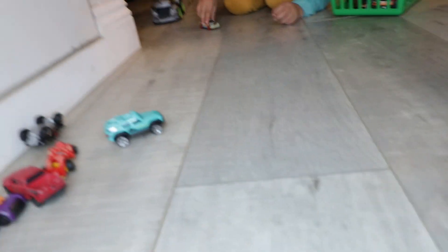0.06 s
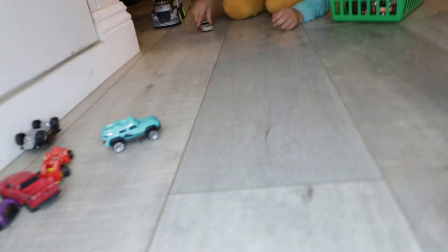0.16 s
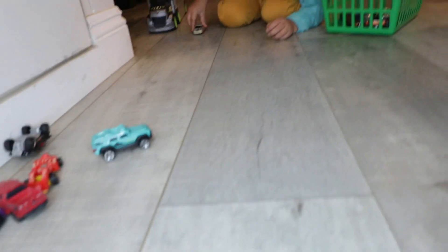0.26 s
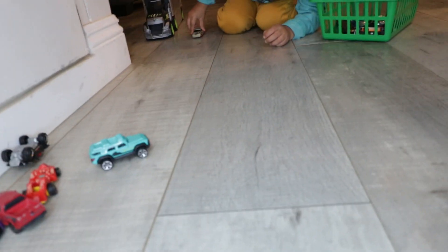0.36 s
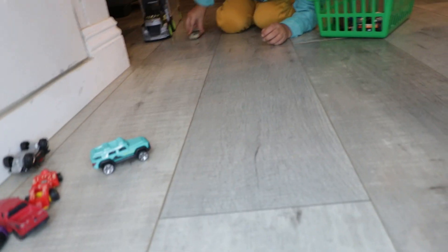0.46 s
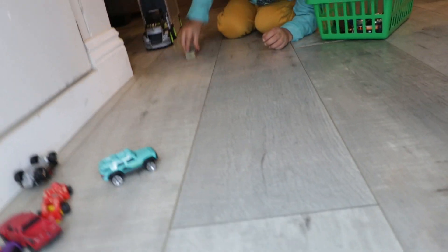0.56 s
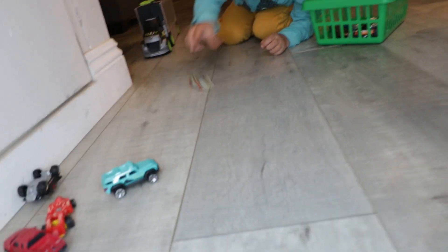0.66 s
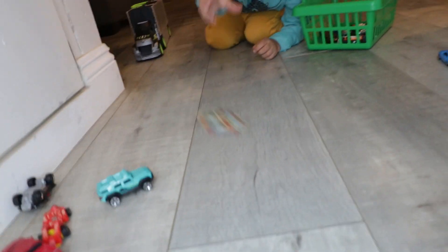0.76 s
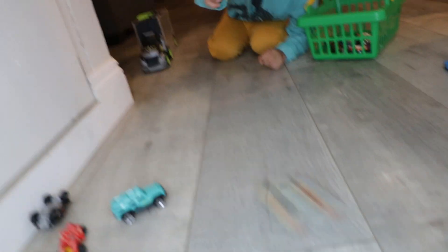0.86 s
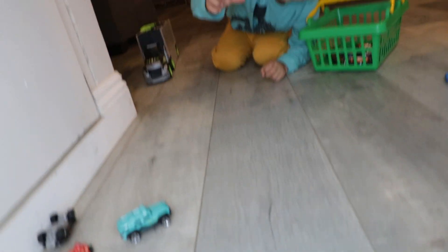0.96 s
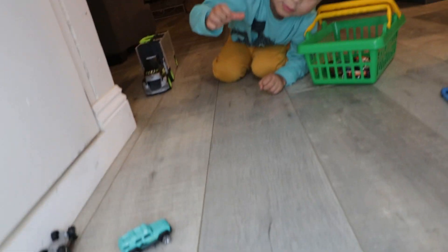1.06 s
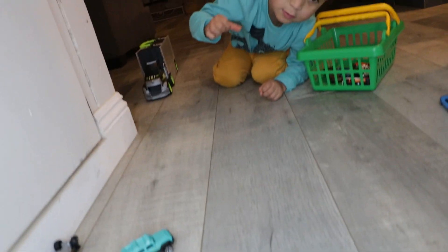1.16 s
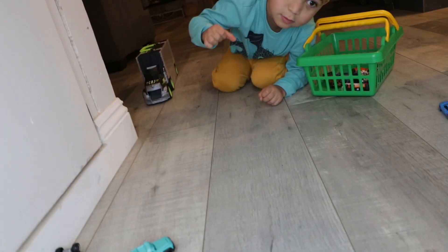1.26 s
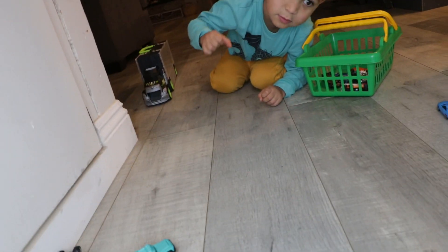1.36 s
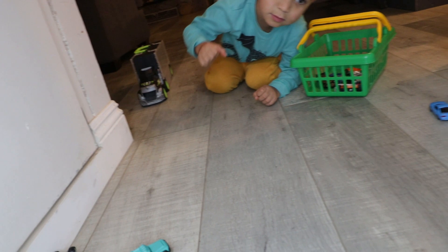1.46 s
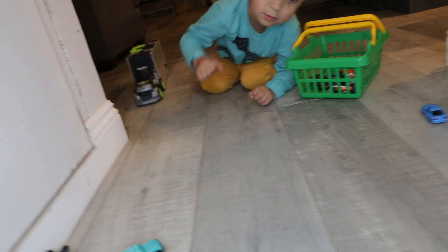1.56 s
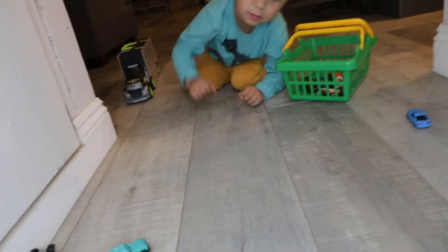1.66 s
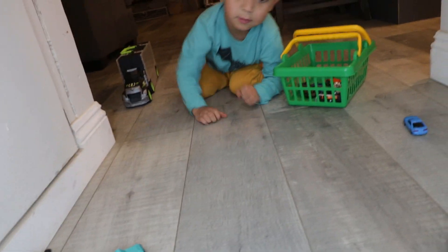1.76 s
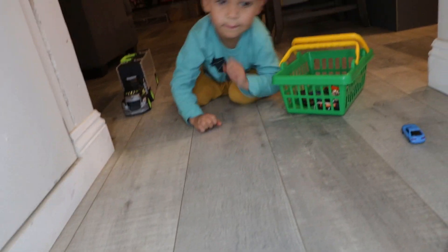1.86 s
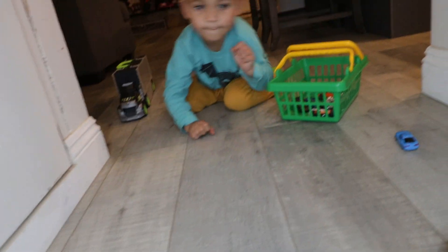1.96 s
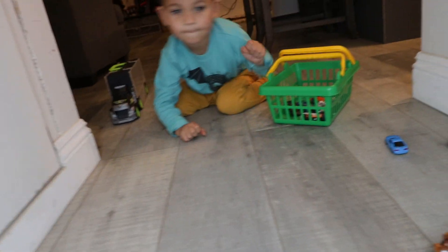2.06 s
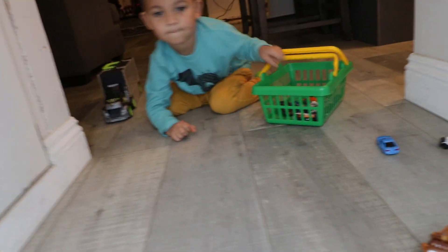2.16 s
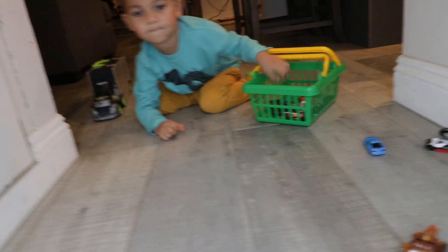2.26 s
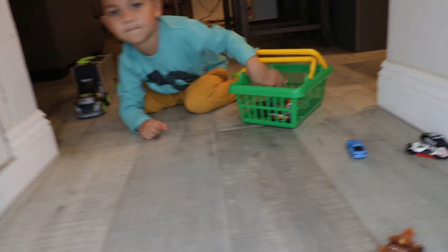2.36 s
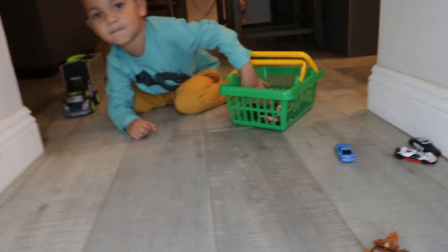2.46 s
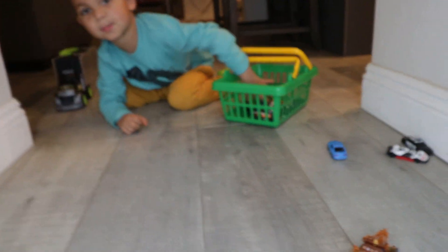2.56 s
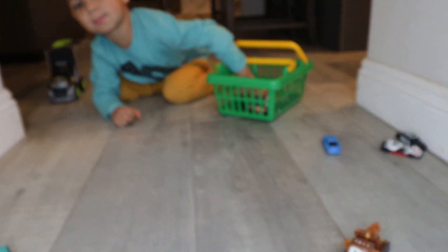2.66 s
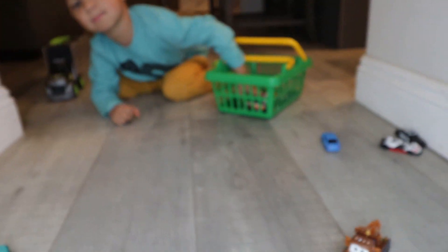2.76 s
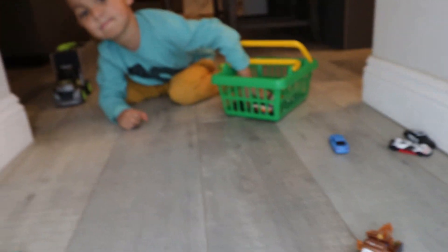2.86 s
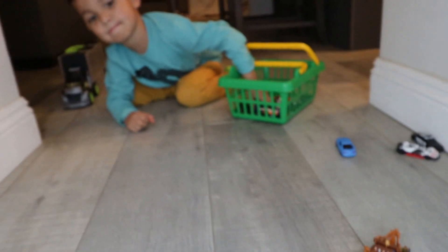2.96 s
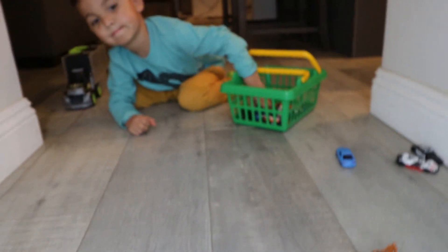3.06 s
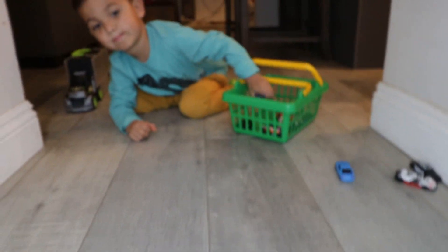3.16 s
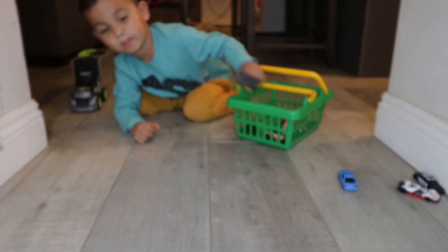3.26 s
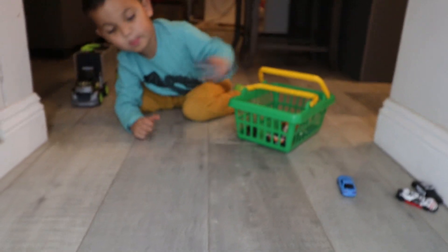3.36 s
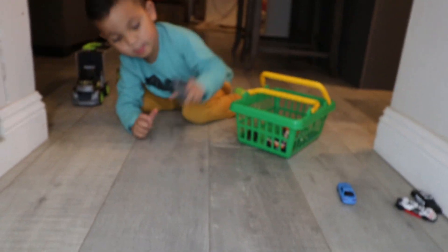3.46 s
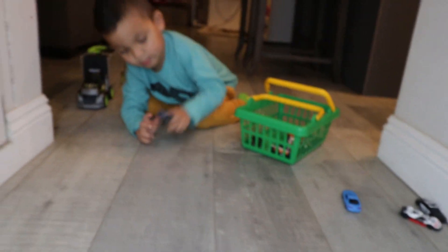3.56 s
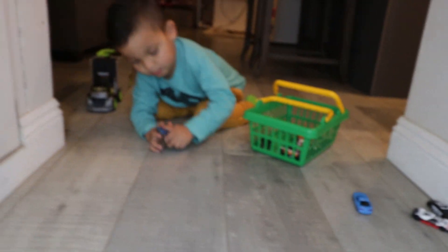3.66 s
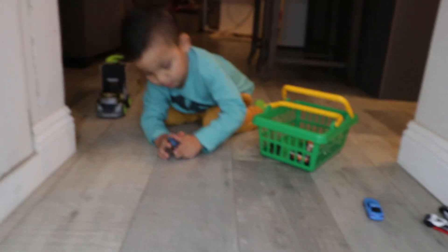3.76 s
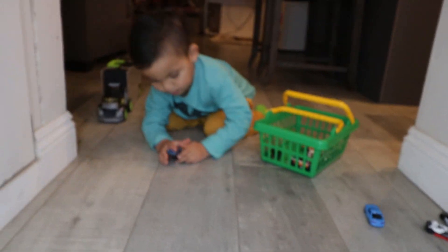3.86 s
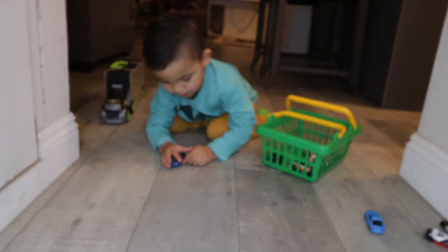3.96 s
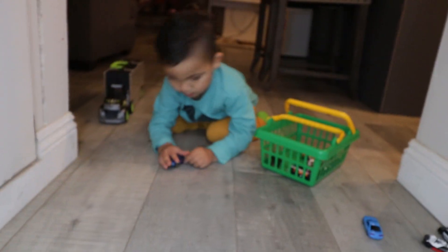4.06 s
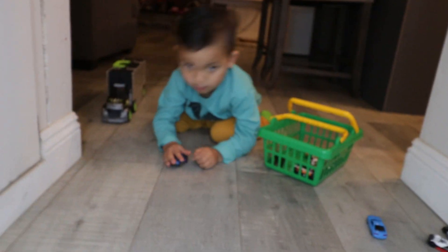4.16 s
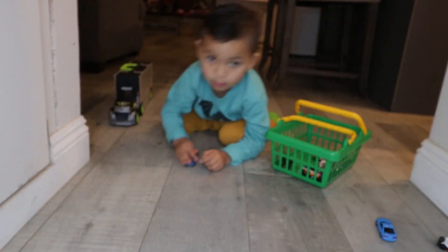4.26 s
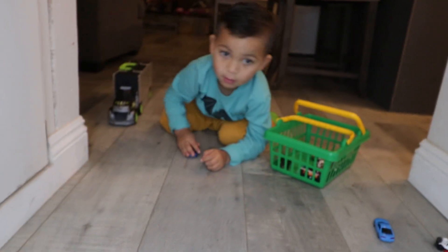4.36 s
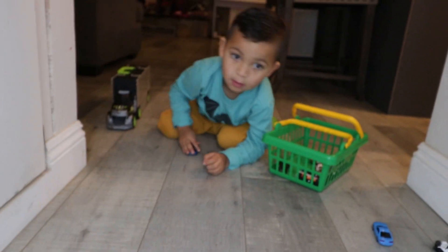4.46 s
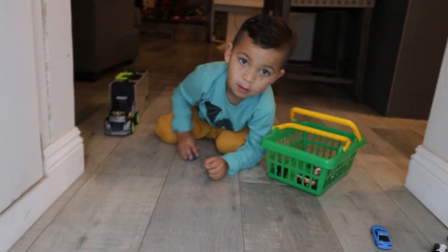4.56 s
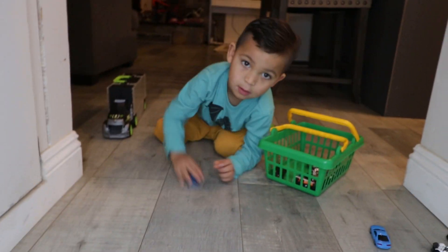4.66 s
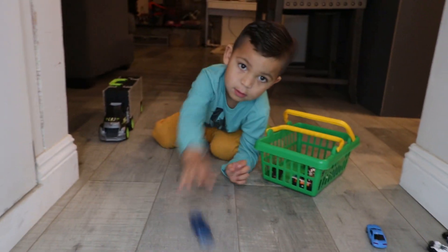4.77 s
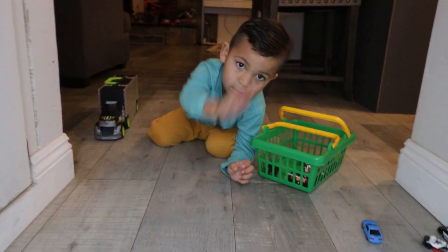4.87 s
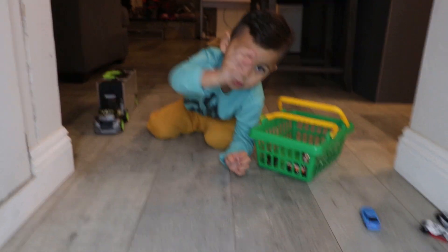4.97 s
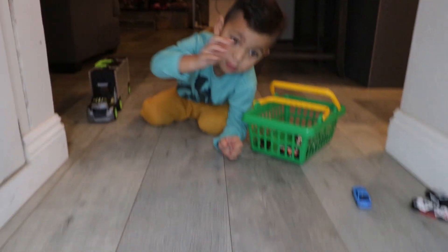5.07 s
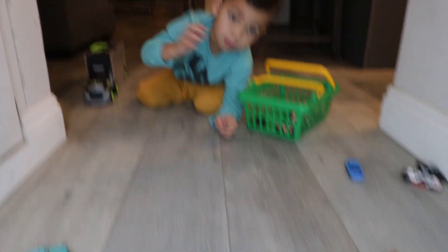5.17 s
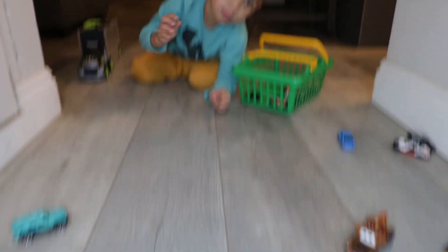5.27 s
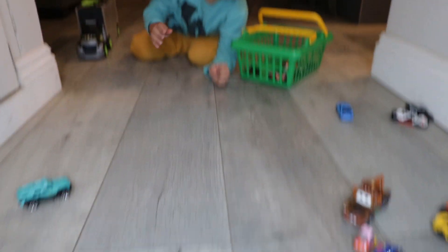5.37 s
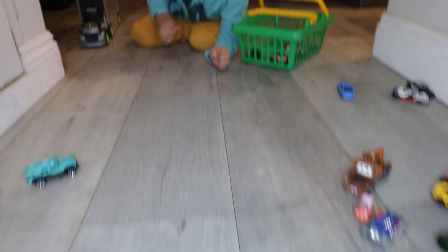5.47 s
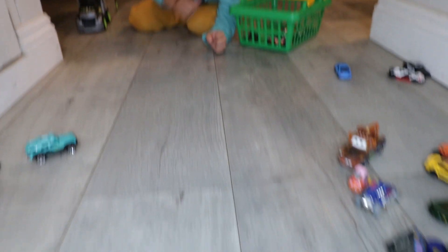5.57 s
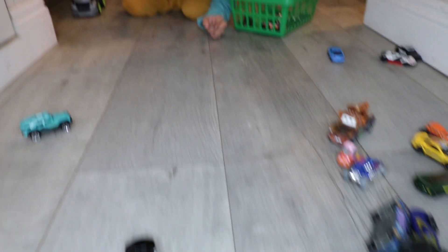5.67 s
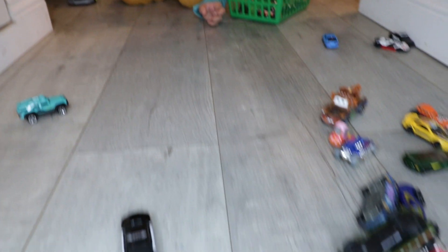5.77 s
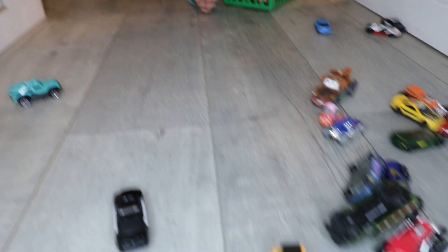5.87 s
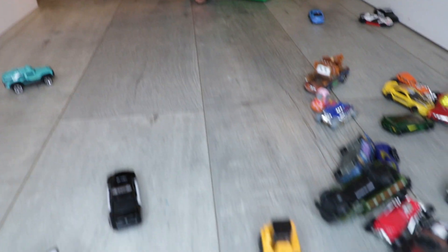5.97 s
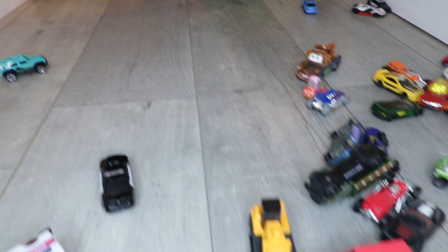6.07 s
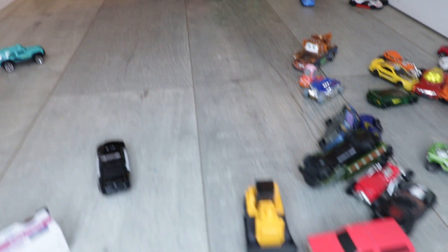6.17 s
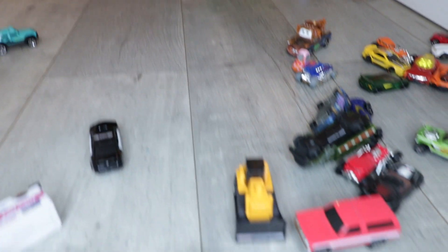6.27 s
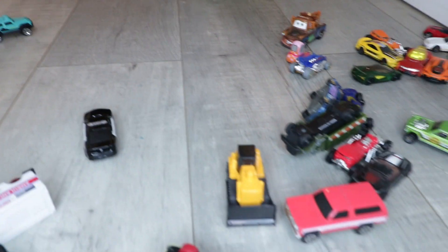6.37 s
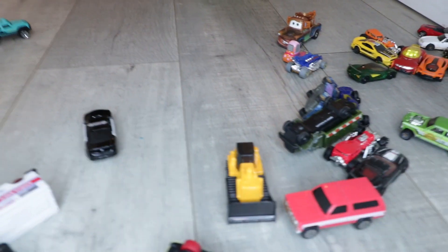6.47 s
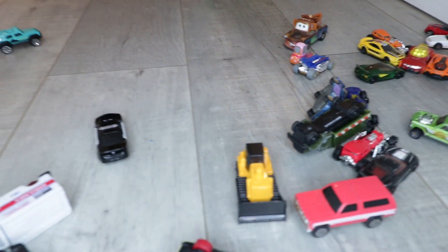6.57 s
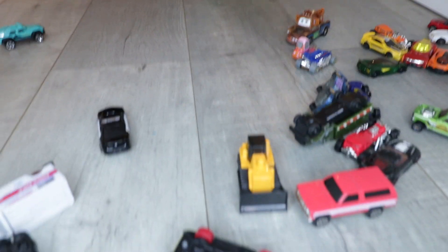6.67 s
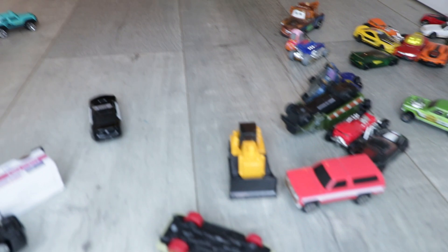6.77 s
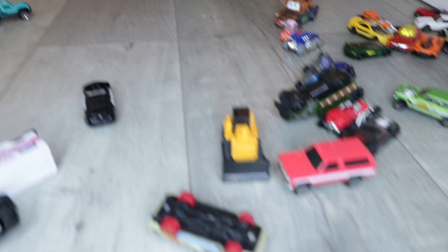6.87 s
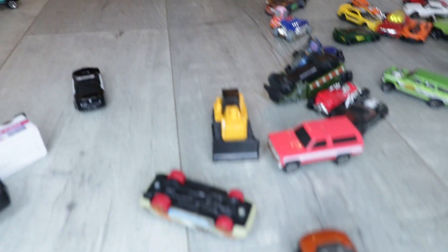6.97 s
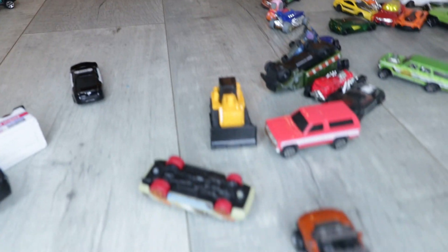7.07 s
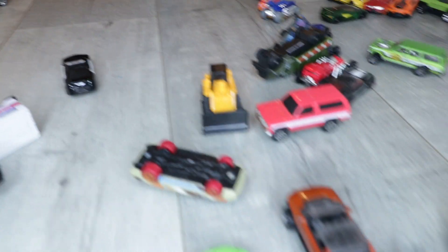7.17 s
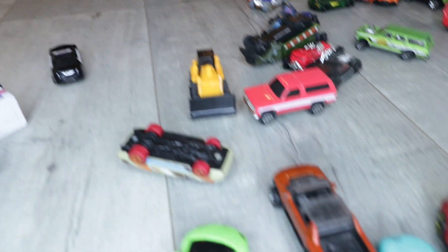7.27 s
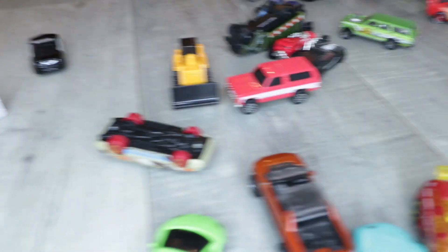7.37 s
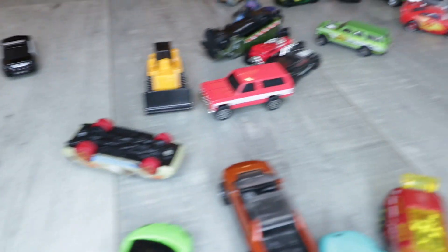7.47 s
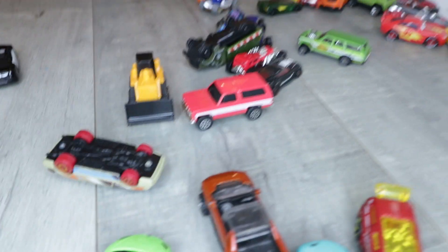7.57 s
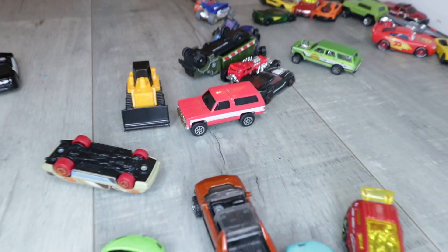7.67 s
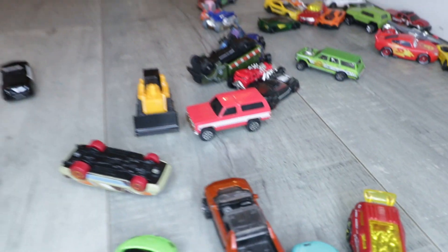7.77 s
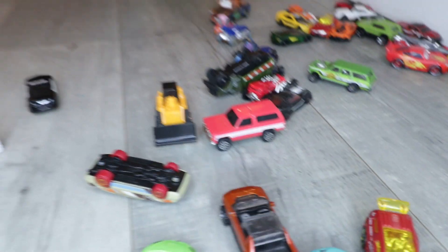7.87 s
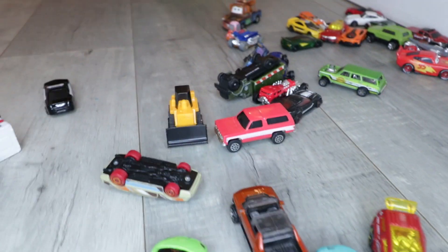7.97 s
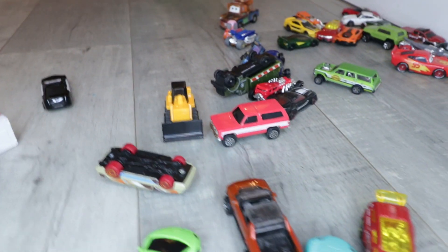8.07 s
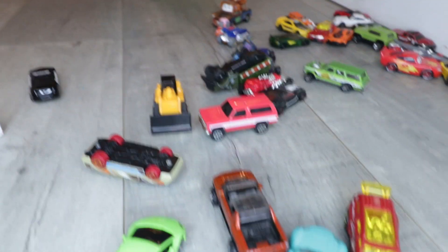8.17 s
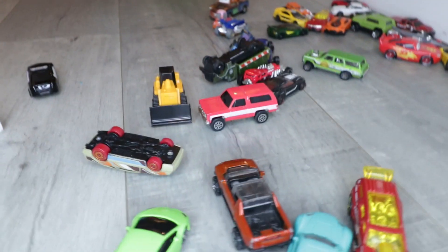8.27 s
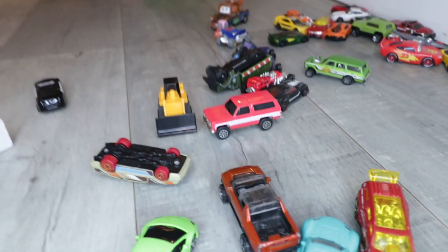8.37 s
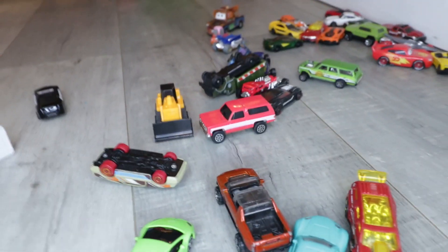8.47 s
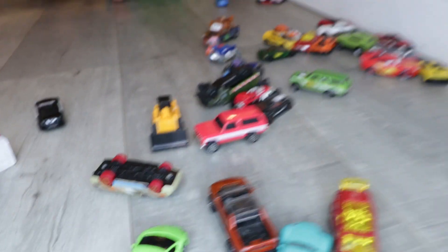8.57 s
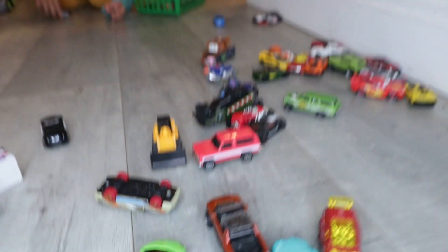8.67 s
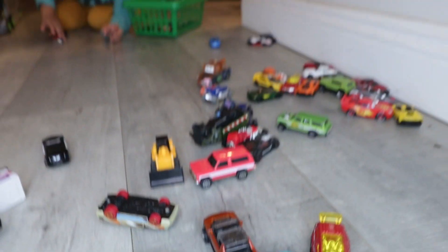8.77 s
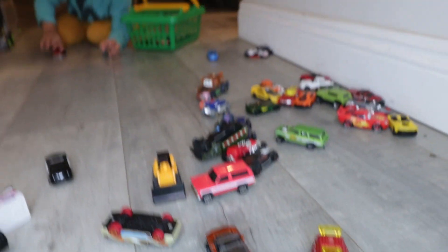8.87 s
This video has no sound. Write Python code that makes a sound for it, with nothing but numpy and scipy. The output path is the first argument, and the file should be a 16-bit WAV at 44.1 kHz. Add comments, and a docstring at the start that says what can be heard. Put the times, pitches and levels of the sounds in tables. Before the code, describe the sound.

Small metal toy cars rattle, clack and roll over a hard hallway floor, with bright dry clicks, a few wooden thuds and short pauses.

```python
"""A hallway with a hard floor: small die-cast toy cars are played with, close to a phone's microphone.
From the start a faint mains hum and room noise lie below, and wheels rattle (random bumps ring the parts).
Soon bodies clack on each other, a plastic basket and the skirting (noise bursts), and the hallway answers.
From half a second cars run free at times and whirr; heavier landings thud in the boards. Later, thin parts
ring on (dying sines) and, near 1.8 s and 8.7 s, a knee or hand lands softly (a falling sine)."""
import sys
import numpy as np
from scipy import signal
from scipy.fft import rfft, irfft, next_fast_len
from scipy.io import wavfile
from scipy.ndimage import uniform_filter1d, map_coordinates

SR = 44100
rng = np.random.default_rng(int(sys.argv[2]) if len(sys.argv) > 2 else 0)


def generate_wav(sig):
    """Save sig (samples, or channels by samples) to the path in sys.argv[1] as 16-bit PCM at SR."""
    pcm = np.round(np.clip(np.atleast_2d(sig).T, -1, 1) * 32767).astype(np.int16)
    wavfile.write(sys.argv[1], SR, pcm)


N = 393372

# the background sinks and returns: start_s, level_db
BACKGROUND_LEVEL = [(0, -42), (.55, -41.5), (.7, -75), (1.5, -55), (1.9, -47), (2.6, -47.5), (3.3, -43.5),
                    (3.8, -48.5), (3.95, -51), (4.3, -44.5), (4.7, -45), (4.9, -68), (5.6, -53.5),
                    (6.3, -45.5), (6.9, -44), (8.0, -46.5), (8.92, -46)]
# spectrum of the room noise: pitch_hz, relative level_db (per Hz)
ROOM_SPECTRUM = [(12, -41), (20, -2), (101, -17), (123, -12), (177, -7), (310, -9), (347, -8.5),
                 (472, -22.5), (660, -22), (780, -24.5), (3250, -27.5), (5850, -33.5), (16000, -44)]
# mains hum: pitch_hz, sine peak level_db (over the background level)
HUM_TONES = [(60, -7.5), (100, -10)]
# bouts of rolling and rummaging: full_from_s, hold_s, swell_db_per_s, fade_db_per_s, rattle_db,
# then rumble_db of the board, scrape_db of the hollows and grit_db (all over the rattle), hollow_pitch_hz
ROLLING_BOUTS = [(0.244, 0.044, 38, 83, -19.5, -16, -12, -17, 1440),
                 (0.555, 0.014, 250, 185, -26, -2.5, -15, -14, 1780),
                 (0.605, 0.034, 216, 240, -17.5, -36, -23, -13, 1770),
                 (0.866, 0.25, 70, 89, -30.5, -30, -18, -7.5, 1690),
                 (1.177, 0.032, 95, 120, -22, -4.5, -8, -10.5, 1930),
                 (1.357, 0.11, 120, 102, -24, -2.5, -5.5, -10.5, 1490),
                 (1.705, 0.0046, 230, 88, -33, -8.5, -5, -13, 1790),
                 (2.079, .01, 575, 100, -36.5, -9.5, -6.5, -16, 1480),
                 (2.281, 0.011, 700, 237, -16, -14, -6.5, -9, 1670),
                 (2.368, 0.084, 298, 147, -38, -9, -3, -10, 1530),
                 (2.608, 0.057, 227, 200, -29, -9, -3.5, -10, 1500),
                 (2.717, .01, 300, 47, -19.5, -16.5, -7.5, -10, 1580),
                 (2.922, 0.0088, 200, 82, -25, -13, -6, -24, 1730),
                 (3.074, .01, 107, 85, -27, -16, -8, -10, 1780),
                 (3.23, 0.039, 65, 110, -33.5, -7.5, 0.5, -19.5, 1750),
                 (3.707, .01, 294, 82, -40.5, -15, -15, -8, 1730),
                 (3.892, 0.031, 303, 96, -37.5, 0, 2, -17, 1440),
                 (4.016, 0.013, 84, 105, -33.5, -29, 1, -10, 1510),
                 (4.339, .01, 290, 49, -23.5, -27.5, -7, -11.5, 2060),
                 (4.693, 0.0091, 333, 134, -14.5, -29.5, -9.5, -7, 2160),
                 (4.86, 0.2, 87, 93.5, -22, -31, -17.5, -9.5, 1830),
                 (5.154, 0.11, 91, 80, -27, -4, -4, -15.5, 1870),
                 (5.37, 0.14, 91, 170, -30, -6, -5.5, -12, 1540),
                 (5.614, 0.011, 100, 100, -38, -5, -11.5, -7, 1250),
                 (6.004, 0.057, 1598, 55, -23.5, -18, -8.5, -8, 1750),
                 (6.395, .01, 160, 250, -38.5, -8, -3, 1, 1350),
                 (6.484, .01, 367, 70, -33, -8, -6, -11, 1650),
                 (6.627, 0.0084, 224, 210, -23.5, -21, -4, -6.5, 1770),
                 (6.746, .01, 190, 135, -23.5, -25, -14, -9, 1550),
                 (6.887, 0.012, 173, 148, -32, 4, -16, -4, 1390),
                 (6.997, 0.035, 196, 76, -22.5, -11, -7.5, -8, 1740),
                 (7.125, 0.061, 100, 104, -29.5, -19, -7.5, -7.5, 1590),
                 (7.222, .01, 120, 133, -23, -13, -11.5, -8, 1670),
                 (7.414, 0.11, 300, 63, -29, -28, -8, -4.5, 1730),
                 (7.57, .12, 80, 77, -22, -26, -11, -12, 1850),
                 (7.761, 0.096, 83, 109, -23, -8, -4, -7.5, 1670),
                 (8.352, 0.0082, 47, 100, -42, 0.5, -15, -5.5, 1400),
                 (8.442, 0.016, 215, 91, -25.5, -16.5, -11, -15, 1400),
                 (8.67, 0.024, 600, 150, -49, 12, -2, -10, 1650),
                 (8.754, 0.057, 330, 60, -37, -11, -26, -3, 1800),
                 (8.916, .03, 81, 100, -26, -18, -11, -12, 2070)]
# car shell resonances: pitch_hz, width_hz, relative level_db (all before squaring)
SHELL_MODES = [(2485, 1680, -3), (3474, 1334, 2.5), (4268, 640, 1.5), (4920, 1290, -7)]
# floor board resonances: pitch_hz, width_hz, relative level_db (all before squaring)
BOARD_MODES = [(302, 1800, -29), (545, 510, 6.5), (806, 1290, -4)]
# cavities of cars and basket: pitch_hz
CAVITIES_HZ = [1286, 1625, 2020]
# spectrum of dust and bright surfaces: pitch_hz, relative level_db (per Hz)
GRIT_SPECTRUM = [(3500, -11.5), (5500, 2.5), (7000, -1), (10000, -8.5), (13000, -13.5), (16000, -18)]
# metal contacts: peak_s, shell_db, knock_db of the hollows and tick_db (both over the shell), length_ms
CONTACTS = [(0.0728, -16.5, -29, -24, 7.3), (0.1554, -9.5, -31, -29, 2.0), (0.1864, -1, -9, -22, 3.3),
            (0.267, -23, -23, -22, 12.0), (0.5584, -17, -17, -16, 3.3), (0.583, -8, -23, -10, 1.5),
            (0.6004, -10.5, -28, -9.5, 4.8), (0.6225, -3.5, -25, -22, 2.3), (0.657, -18, -20, -22, 7.6),
            (0.679, -7.5, -26, -3, 2.7), (0.694, -1.5, -24, -10, 2.0), (0.7274, -12, -25, -4, 5.5),
            (0.7498, -18, -22, -8, 11.2), (0.7669, -12.5, -33, -8.5, 6.3), (0.783, -18, -23, -9, 5.9),
            (0.8084, -7.5, -13, -8, 3.4), (0.8424, -17, -12, -6, 10), (0.864, -11.5, -24, -5.5, 5.8),
            (0.8743, -16, -23, -3, 3.4), (0.8851, -12, -31, -8, 4.3), (0.903, -11.5, -18, -4.5, 4.8),
            (0.9373, -14.5, -21, -6, 3.3), (0.952, -19, -26, -5, 9.8), (0.9709, -5.5, -18, -4, 6.1),
            (0.994, -17, -16, -13, 6), (1.0375, 1.5, -8.5, -10, 2.4), (1.182, -8, 0, -8, 6.37),
            (1.1943, -3.5, -19, -16, 4.9), (1.242, -21.5, 8, -14, 2.5), (1.3085, -13.5, -15, -6, 6),
            (1.3448, -25.5, -1.5, -5, 18), (1.4207, -14, -20, -19, 7.8), (1.4636, -18, -6, -25, 6.9),
            (1.5012, -8.5, -11, -17, 4.04), (1.5747, -17, -25, -15, 4.2), (1.6892, -22, 2, -22, 5.6),
            (1.8128, -29, 8.5, -7, 3.2), (2.0612, -26.5, -13, -12, 10.7), (2.2591, -15, -6, -13, 12.0),
            (2.2777, -23, -16, -21, 2.1), (2.3068, -6, -16, -15, 1.5), (2.3405, -24.5, -13, 6, 4.6),
            (2.5649, -18.5, -1, -9, 1.9), (2.5864, -13.5, -11, -15, 9.3), (2.6098, -14, -7, -9, 9.4),
            (2.639, -5.5, -3.5, -2.5, 4), (2.6976, -11, -11, -8, 3), (2.7287, -13.5, -11, -2.5, 10.1),
            (2.8255, -13.5, -20, -8, 5.1), (2.8413, -11.5, -2, -13, 3.8), (2.914, -8.5, -11, -14, 2.5),
            (2.9331, -12, -4, -7, 3.4), (2.9841, -17.5, -6, -5.5, 5.9), (3.0609, -14, 2.5, -9, 4.2),
            (3.0671, -12.5, 0.5, -4, 2.2), (3.1258, -4.5, -4.5, -10.5, 2.0), (3.226, -19, -2, -12, 5.8),
            (3.2626, -25.5, -10, -15, 8.4), (3.392, -29, -10, -18, 3.5), (3.7106, -17, -12, 1, 3.1),
            (3.8436, -13.5, 9.5, -1.5, 4.47), (3.8583, -28, 10, -9, 4.2), (3.9057, -24, 10, -13, 4.3),
            (3.9164, -24, 16, -17, 3.5), (3.9326, -12, 4, -10, 3.8), (3.9574, -8.5, 1, -9.5, 4.6),
            (3.997, -13, -20, -9, 3.8), (4.016, -17, -10, -7, 6.4), (4.3225, -7.5, -10, -4, 3.3),
            (4.3403, -37, -10, 0, 10.3), (4.356, -25, -18, -1, 5.6), (4.683, -16.5, -3, -14, 17),
            (4.7327, -18, -24, -7, 10.8), (4.7987, -20, -30, -7, 4.94), (4.8119, -19, -22, 1, 5.6),
            (4.92, -11, -23, -18, 8.7), (4.9433, -12.5, -25, -11, 6.2), (4.9718, -18, -29, -14.5, 9.2),
            (5.0427, -13.5, -16, -17, 6.3), (5.067, -5.5, -10, -6.5, 7.8), (5.1187, -13, -15, -17, 4.5),
            (5.1962, -6, -10, -22, 2.1), (5.245, -11, -3, -17, 8.1), (5.2786, -7, -1, -18, 4.16),
            (5.3262, -15, 4.5, -15, 1.9), (5.3468, -17, -1, -7, 5.4), (5.3816, -13.5, -19, -11, 5.6),
            (5.433, -23, -2.5, -14, 13), (5.4436, -23, -19, -3, 5.3), (5.4914, -13, -4.5, -14, 5.84),
            (5.5842, -11.5, -9.5, -23, 2.3), (5.6255, -9, -11, -11.5, 1), (6.0003, -20.5, -4, 1.5, 5.4),
            (6.0273, -17.5, 3, -18, 4.8), (6.059, -18, -10, -1, 9.8), (6.0799, -14, -22, -6, 12.0),
            (6.0945, -13, -18, -11, 3.96), (6.232, -15.5, -27, -6.5, 10), (6.3832, -21, -11, -5.5, 14),
            (6.4745, -20.5, -4.5, -4, 9.6), (6.513, -24, -6.5, -7, 14), (6.6343, -12, -10, -16, 4.5),
            (6.7126, -12.5, -12, -5.5, 9.4), (6.7507, -6, -10.5, -7, 5.9), (6.8266, -9.5, -8.5, -8, 4.1),
            (6.8609, -6.5, -5.5, -18, 3.2), (6.8819, -14, -6, -12, 9.9), (6.9556, -7.5, -25, -14, 5.6),
            (6.9678, -8, -12.5, -10.5, 6.2), (7.0105, -0.5, -6.5, -11, 1.5), (7.0267, -11, -1, -10, 3.5),
            (7.091, -20, -13, -2.5, 15), (7.137, -18.5, -9, -7, 12.0), (7.1907, -24, -14, 0, 15),
            (7.3223, -19.5, -18, -7, 4.8), (7.3611, -9, -20, -6, 13), (7.3656, -7, -12, -6, 14),
            (7.3811, -7, -13, -6, 4.1), (7.4553, -15, -8, -22, 3.7), (7.4836, -19, -16, 5.5, 5.1),
            (7.5154, -17, -4, -12, 4.3), (7.541, -24.5, -15, -22, 1.3), (7.554, -2, -9.5, -7.5, 4.8),
            (7.608, -12, -8, -8, 2.9), (7.6208, -10, -16, -8.5, 12.0), (7.7438, -11, -8.5, -7, 9.1),
            (7.8172, -6.5, -5, -10, 3.2), (7.8994, -16, -15, -8, 17), (8.145, -29.5, -10, -24, 5.6),
            (8.3332, -34, 1, -1, 5.2), (8.7314, -15, -2, 3, 5.3), (8.7437, -12.5, -10, -5.5, 11.3),
            (8.8002, 1, -14, -10, 2.0), (8.817, -9, -4, -3.5, 8.5), (8.863, -6.5, -7, -10, 2.0)]
# how fast the hallway dies away: pitch_hz, t60_s
HALLWAY_DECAY = [(200, 0.36), (530, 0.32), (1400, 0.19), (3700, 0.18), (9700, 0.075)]
# a car runs free: start_s, end_s
FREE_RUNS = [(0.552, 1.2), (4.72, 5.5)]
# axles of a free-running car sing higher: pitch_hz, width_hz, relative level_db
WHIRR_MODES = [(4870, 790, 0)]
# heavier landings on the boards: peak_s, level_db
BOARD_LANDINGS = [(0.558, -22), (0.841, -28), (1.035, -11.5), (1.096, -24), (1.18, -9.5), (1.241, -13.5),
                  (1.307, -21), (1.349, -10), (1.37, -16), (1.419, -18), (1.462, -22), (1.574, -37),
                  (1.715, -26), (2.061, -32), (2.637, -20.5), (2.914, -21), (2.933, -27), (3.223, -34),
                  (3.295, -24), (3.842, -20.5), (5.065, -19), (5.123, -27), (5.244, -12), (5.27, -13.5),
                  (5.3, -13), (5.322, -19.5), (5.378, -17.5), (5.488, -15.5), (5.578, -19), (5.622, -33.5),
                  (6.47, -27.5), (6.858, -8), (6.88, -24), (7.21, -18.5), (7.743, -25), (7.815, -29),
                  (7.835, -18.5), (8.658, -26.5), (8.73, -17)]
# thin parts that ring on after a blow: start_s, pitch_hz, level_db, t60_s
RINGING_PARTS = [(1.687, 1960, -21, 0.11), (1.708, 1890, -20.5, 0.1), (1.727, 1660, -26, 0.088),
                 (6.389, 1130, -26.5, 0.14), (7.037, 1590, -28.5, 0.84), (7.381, 1620, -38, 0.93),
                 (7.745, 1535, -24, 0.43), (7.815, 1600, -27, 0.62)]
# a knee or hand lands softly: start_s, level_db
SOFT_LANDINGS = [(1.82, -21), (8.732, -28)]

WHIRR_DB = -8  # over the rattle
CONTACT_THUD_DB = -34.5  # what every contact gives the floor, over the shell
LANDING_MS = 4.98
FIRST_TOUCH = 5.1  # factor of a blow's first touch on the board, over its chatter
ECHO_DB = -13
BAND_LIMIT_HZ = 15900


def amp(db):
    """Decibels to a linear factor."""
    return 10 ** (np.asarray(db) / 20)


def unit(x):
    """Scale to an RMS of one."""
    return x / np.sqrt(np.mean(x ** 2) + 1e-20)


def along(points, hz):
    """Read (Hz, value) points on a log frequency axis."""
    point_hz, value = np.transpose(points)
    return np.interp(np.log(hz + 1), np.log(point_hz + 1), value)


def curves(rows):
    """One value per sample for each column after the time."""
    s, *columns = np.transpose(rows)
    return [np.interp(np.arange(N) / SR, s, column) for column in columns]


def wobble(rate):
    """A smooth random curve, rate knots a second."""
    knots = rng.standard_normal(N // 20)
    return map_coordinates(knots, [np.arange(N) * rate / SR])


def filtered(x, response):
    """x through a complex response of frequency, padded so that its tail does not wrap round."""
    size = next_fast_len(N + SR // 2)
    hz = np.fft.rfftfreq(size, 1 / SR)
    return irfft(rfft(x, size) * response(hz), size)[..., :N]


def coloured(force, response):
    """A force through a response that is scaled to keep the power of white noise."""
    def level_response(hz):
        gain = response(hz)
        return gain / np.sqrt(np.mean(np.abs(gain) ** 2))
    return filtered(force, level_response)


def resonances(modes):
    """The causal response of (Hz, width Hz, dB) modes, summed with alternating sign."""
    def response(f):
        total = 0
        for k, (centre, width, db) in enumerate(modes):
            damping = 1j * f * width
            total = total + (-1) ** k * amp(db) * damping / (centre ** 2 - f ** 2 + damping)
        return total
    return response


def squared_resonances(modes):
    """Squaring leaves dark valleys around the resonances."""
    return lambda hz: resonances(modes)(hz) ** 2


def varied(x, depth_db):
    """Different cars and parts speak in turn: patches of the spectrum swell and fade at random."""
    spectrum = signal.stft(x, nperseg=256)[2]
    across_pitch = uniform_filter1d(rng.standard_normal(spectrum.shape), size=2, axis=0)
    patches = uniform_filter1d(across_pitch, size=12, axis=1)
    gain = amp(depth_db * unit(patches))
    return signal.istft(spectrum * unit(gain), nperseg=256)[1][:N]


def sounding(shell, board, hollow, dust):
    """Four forces ring the shell, the board, the nearest cavities and the bright surfaces."""
    hollow_hz = bouts()[-1]
    near = np.array([np.exp(-(np.log(hollow_hz / hz) / .22) ** 2) + .1 for hz in CAVITIES_HZ])
    near = near / np.linalg.norm(near, axis=0)
    cars = coloured(shell, squared_resonances(SHELL_MODES))
    for hz, share in zip(CAVITIES_HZ, near):
        cars = cars + coloured(share * hollow, squared_resonances([(hz, 650, 0)]))
    cars = cars + coloured(dust, lambda hz: amp(along(GRIT_SPECTRUM, hz)))
    return varied(cars, depth_db=3) + coloured(board, squared_resonances(BOARD_MODES))


def background():
    """Room noise and mains hum, both wavering."""
    level_db, = curves(BACKGROUND_LEVEL)
    air = unit(filtered(rng.standard_normal(N), lambda hz: amp(along(ROOM_SPECTRUM, hz))))
    t = np.arange(N) / SR
    hum = sum(amp(db + 1.2 * wobble(1.53)) * np.sin(2 * np.pi * hz * t) for hz, db in HUM_TONES)
    return amp(level_db) * (amp(1.0 * wobble(6.1)) * air + hum)


def bouts():
    """Each bout swells, holds and fades: gains of the four layers, and the hollow pitch of the loudest."""
    t = np.arange(0, N, 64) / SR
    columns = np.transpose(ROLLING_BOUTS)[..., None]
    s, hold, swell, fade, db, rumble_db, scrape_db, grit_db, hz = columns
    before, after = np.clip(s - t, 0, None), np.clip(t - s - hold, 0, None)
    level_db = db - swell * before - fade * after
    power = [amp(level_db + over_db) ** 2 for over_db in (0, rumble_db, scrape_db, grit_db)]
    hollow_hz = (power[2] * hz).sum(axis=0) / power[2].sum(axis=0)
    gains = [np.sqrt(p.sum(axis=0)) for p in power]
    return [np.interp(np.arange(N) / SR, t, curve) for curve in gains + [hollow_hz]]


def running():
    """One while a car runs free, with soft edges."""
    t = np.arange(N) / SR
    free = sum(1. * (t > start) * (t < end) for start, end in FREE_RUNS)
    return uniform_filter1d(free, size=1500)


def wheel_chatter():
    """Level swings in units of spread: uneven hops when a car runs free, and a mild flutter throughout."""
    hops_per_s = 65 * (1 + .35 * wobble(30))
    turn = np.cumsum(hops_per_s) / SR % 1
    hop = uniform_filter1d(1.7 - 2.17 * turn, size=60)  # each landing starts sharply and dies away
    return running() * 1.73 * hop + 0.69 * wobble(70)


def bumps(rate, spread_db, smooth):
    """Random small impacts of uneven size, rate a second, over a share of smooth scraping."""
    chance, size, sign = rng.random((3, N))
    strength = amp(-spread_db * np.log(size + 1e-4))
    knocks = (chance < rate / SR) * strength * np.sign(sign - .5)
    return unit(unit(knocks) + smooth * rng.standard_normal(N))


def rolling():
    """Loose axles chatter in the shell, wheels drum the board, dust crackles under them."""
    rattle, rumble, scrape, grit, _ = bouts()
    chatter = wheel_chatter()
    shell = rattle * unit(amp(2.6 * chatter) * bumps(1400, spread_db=1.5, smooth=0.94))
    board = rumble * unit(amp(3.5 * wobble(40)) * bumps(400, spread_db=2.5, smooth=1.18))
    hollow = scrape * unit(amp(2.44 * chatter) * bumps(900, spread_db=2.5, smooth=0.85))
    dust = grit * unit(amp(2.9 * chatter) * bumps(3800, spread_db=3, smooth=0.97))
    axles = unit(amp(2.4 * chatter) * bumps(1400, spread_db=1.5, smooth=0.8))
    whirr = amp(WHIRR_DB) * running() * rattle * axles
    return sounding(shell, board, hollow, dust) + coloured(whirr, resonances(WHIRR_MODES))


def clacks():
    """Each contact or landing is a few ms of chatter that swells to its peak and dies."""
    t = np.arange(SR // 20) / SR
    force = np.zeros((4, N + len(t)))  # shell, board, hollow, dust
    contacts = []
    for s, db, knock_db, tick_db, ms in CONTACTS:
        levels = amp(db + np.array([0, CONTACT_THUD_DB, knock_db, tick_db]))
        contacts.append((s, levels, ms))
    for s, db in BOARD_LANDINGS:
        contacts.append((s, amp(db) * np.array([0, 1, 0, 0]), LANDING_MS))
    for s, levels, ms in contacts:
        length = ms / 1000
        rise = .25 * length
        start = round((s - rise) * SR)
        after = np.clip(t - rise, 0, None)
        swell = np.minimum(t / rise, 1) ** 1.12
        fade = 0.82 * np.exp(-after / (.5 * length)) + 0.25 * np.exp(-after / 0.0093)  # a weaker tail lingers for about 9 ms
        chatter = rng.standard_normal((4, len(t)))
        force[:, start:start + len(t)] += levels[:, None] * swell * fade * chatter
        force[1, start] += FIRST_TOUCH * levels[1]
    return sounding(*force[:, :N])


def hallway(x):
    """Each frequency of the echo dies at its own speed; a new tail every quarter second."""
    out, hop = np.zeros(N + SR), SR // 4
    for k in range(0, N, hop):
        hz, t, z = signal.stft(rng.standard_normal(SR // 2), SR, nperseg=256)
        decay = amp(-60 * t / along(HALLWAY_DECAY, hz)[:, None])
        tail = signal.istft(z * decay, SR, nperseg=256)[1]
        wet = signal.fftconvolve(x[k:k + hop], tail / np.linalg.norm(tail))
        out[k + 200:][:len(wet)] += wet  # the echo sets in 4.5 ms late
    return out[:N]


def rings():
    """Single modes that waver in strength and pitch while they die."""
    out, t = np.zeros(N + SR), np.arange(SR // 2) / SR
    for s, hz, db, t60 in RINGING_PARTS:
        waver = wobble(44)[:len(t)]
        onset = 1 - np.exp(-t / 0.0011)
        fade = amp(db + 1.1 * waver - 60 * t / t60) * onset
        out[round(s * SR):][:len(t)] += fade * np.sin(2 * np.pi * hz * t + waver)
    return out[:N]


def thumps():
    """One slow push into the floor, falling in pitch from 170 Hz with a t60 of 31 ms."""
    out, t = np.zeros(N + SR), np.arange(SR // 20) / SR
    push = np.sin(2 * np.pi * 170 * t * (1 - 12 * t))
    for s, db in SOFT_LANDINGS:
        out[round(s * SR):][:len(t)] += amp(db - 60 * t / 0.031) * push
    return out[:N]


def scene():
    """Everything heard in the hallway, on one channel; only the blows are echoed."""
    blows = clacks()
    echo = amp(ECHO_DB) * hallway(blows)
    return (background() + rolling() + blows + echo + rings() + thumps())[None]


def record(dry):
    """The loudest blows clip and pull the gain down for a moment; nothing stays above the band limit."""
    excess = np.clip(np.abs(dry) - 1, 0, None)
    release = np.hanning(SR // 6)[None, SR // 12:]  # lets go within 83 ms
    load = np.abs(signal.fftconvolve(excess, release, axes=1))
    late_load = np.pad(load, ((0, 0), (150, 0)))[:, :N]  # the gain follows 3.4 ms late
    held = dry / (1 + 0.19 * late_load)
    clipped = held / (1 + np.abs(held) ** 8) ** (1 / 8)
    return filtered(clipped, lambda hz: hz < BAND_LIMIT_HZ)


dry = scene()
out = record(dry)
generate_wav(out)
```